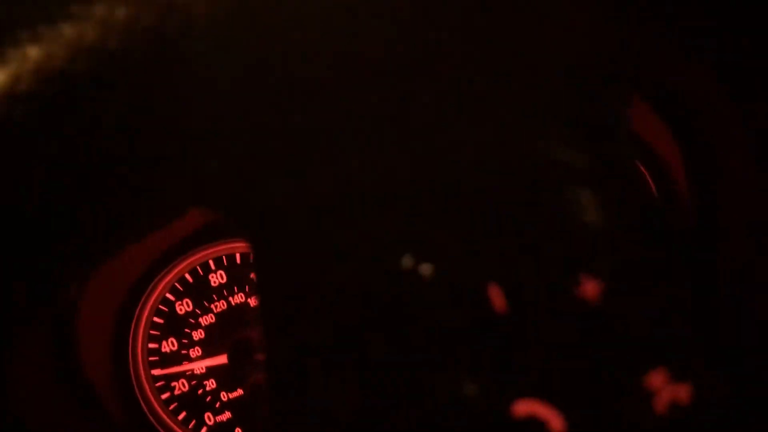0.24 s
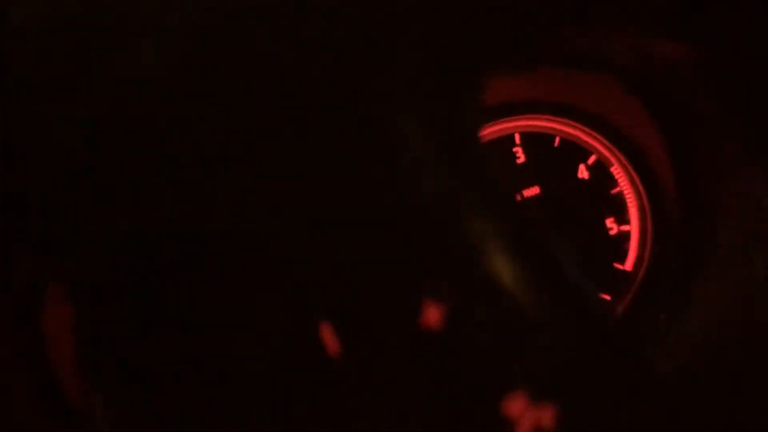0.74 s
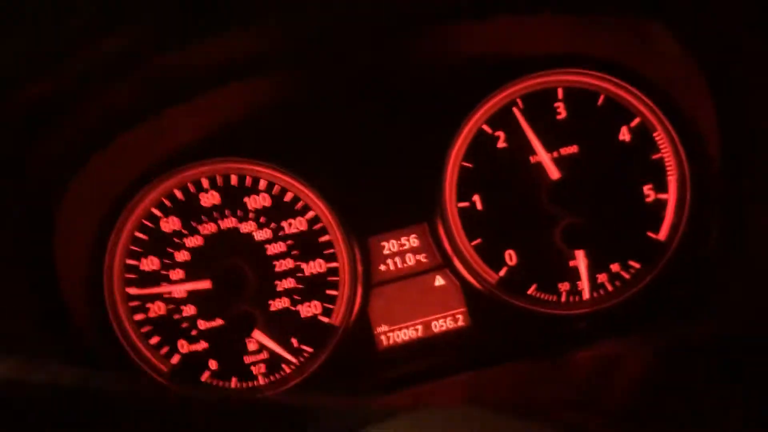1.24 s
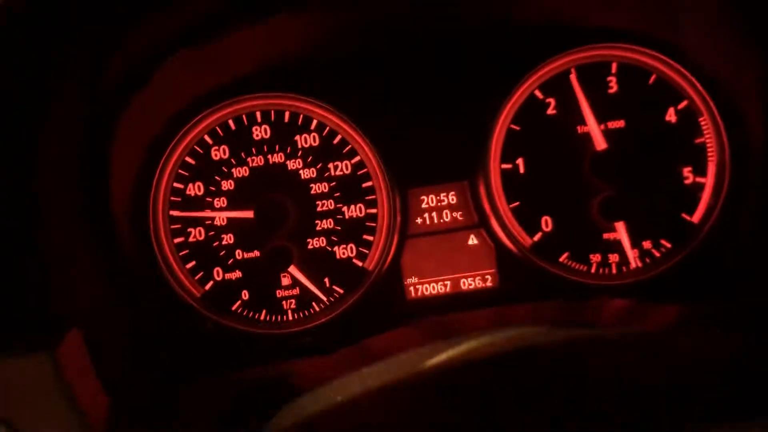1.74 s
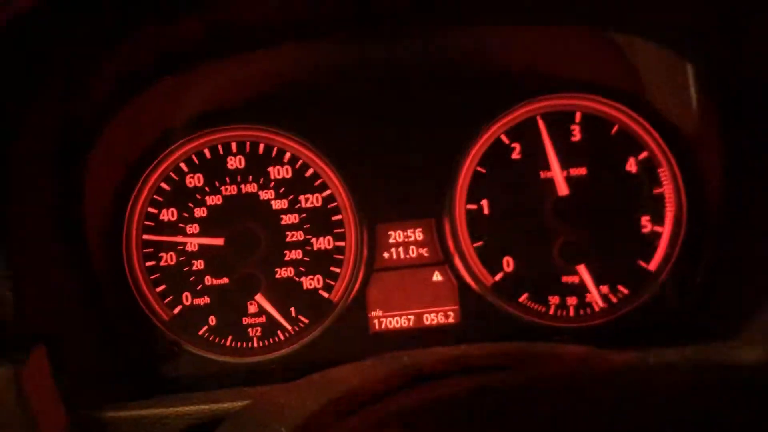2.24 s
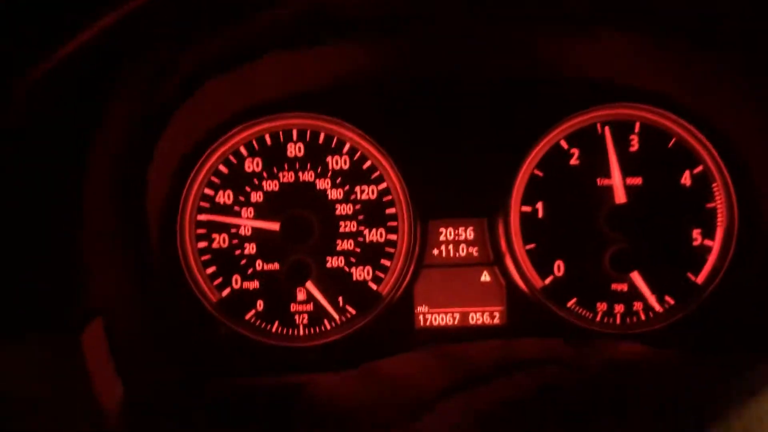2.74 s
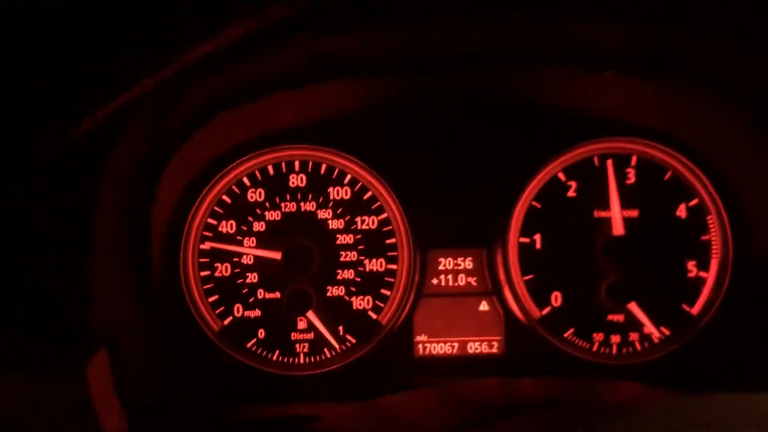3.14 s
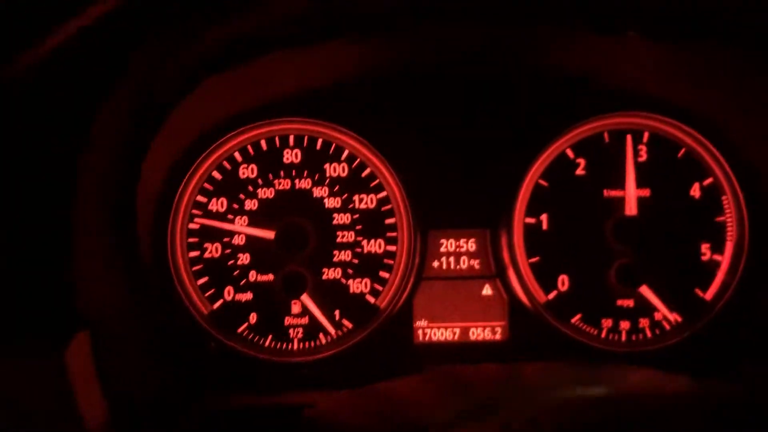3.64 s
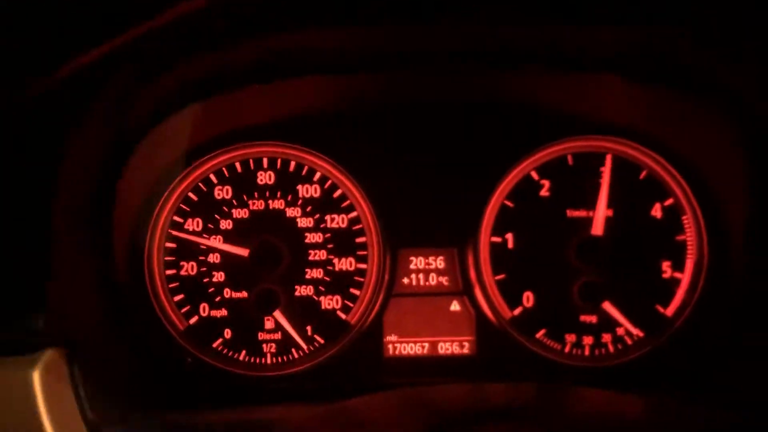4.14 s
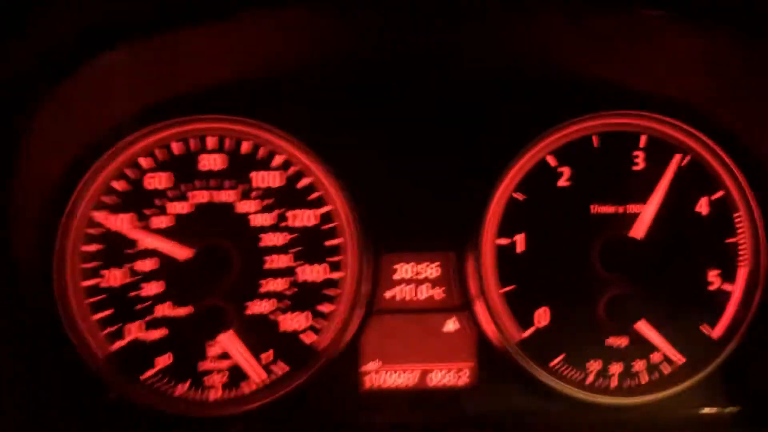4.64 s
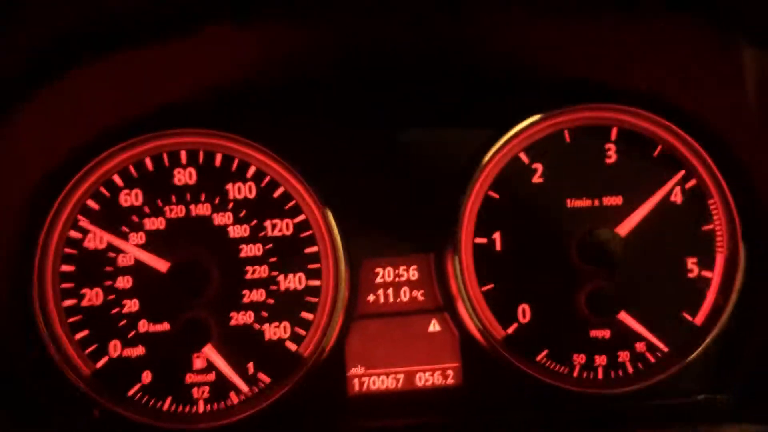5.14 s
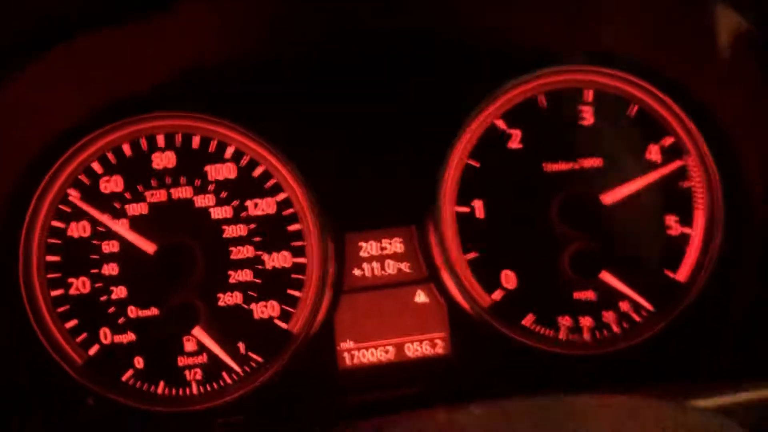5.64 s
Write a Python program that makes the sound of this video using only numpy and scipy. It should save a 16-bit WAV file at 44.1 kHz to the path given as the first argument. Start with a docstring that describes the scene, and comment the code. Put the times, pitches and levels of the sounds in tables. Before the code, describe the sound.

A diesel car is heard from inside the cabin, rolling along with a low engine drone and uneven road rumble. Light trim ticks and a faint cloth rustle sit close to the microphone. After about three and a half seconds the throttle opens and the engine note climbs strongly to the end, with a slight clatter. A few faint metallic clinks and dull thumps from road joints come during the acceleration.

```python
"""Inside the cabin of a six-cylinder diesel car: a light throttle, then a hard pull with a rising note.
The cylinders drone, roar and clatter through the engine mounts and exhaust; the turbo whistles briefly.
Tyres rumble and thump over road joints, which shake loose trim. The body booms and air hisses past
the seals. A sleeve rustles, trim ticks, a small metal thing clinks, and a faint hum stops early on."""
import sys
import numpy as np
from scipy import signal
from scipy.fft import rfft, irfft, next_fast_len
from scipy.io import wavfile

SR = 44100
rng = np.random.default_rng(int(sys.argv[2]) if len(sys.argv) > 2 else 0)


def wav_record(signal):
    """Record a signal, one row per channel, as 16-bit PCM in the file named by sys.argv[1]."""
    frames = np.transpose(np.atleast_2d(signal))
    bounded = np.clip(frames, -1, 1)
    # unit amplitude maps onto the largest positive 16-bit level
    quanta = np.round(bounded * 32767).astype(np.int16)
    wavfile.write(sys.argv[1], SR, quanta)


N = 260190


def engine():
    """The diesel repeats its cycle every two crank turns; its noise comes in through the mounts."""
    # Each row: time in seconds, crank speed in turns a minute.
    speeds = [(0.0, 2411), (0.3, 2424), (0.6, 2410), (1.2, 2447), (1.8, 2511), (2.3, 2579), (2.7, 2654),
              (3.05, 2703), (3.3, 2767), (3.55, 2866), (3.8, 3004), (4.05, 3185), (4.4, 3480), (5.0, 3985),
              (5.45, 4337), (5.9, 4649)]
    # Each row: time in seconds, throttle from 0 (light) to 1 (full).
    throttle = [(0, 0), (3.45, 0.2), (3.8, 0.93), (5.9, 0.9)]
    rpm, = curves(speeds)
    load, = curves(throttle)
    cycle_hz = rpm / 120
    phase = 2 * np.pi * np.cumsum(cycle_hz) / SR
    doublings = np.log2(rpm / 2400)  # of speed, counted from 2400 rpm
    knock = np.exp(.25 * np.cos(6 * phase))  # swells once per firing
    note = drone(cycle_hz, phase, load)
    rough = roar(doublings, knock) + clatter(doublings, knock, phase, load)
    return note + filtered(rough, lambda hz: amp(cabin_db(hz, path=0)))


def drone(cycle_hz, phase, load):
    """Unequal cylinders sound many multiples of the cycle rate; the sixth is the firing rate."""
    # Each row: time in seconds, gain of the whole note in dB.
    loudness = [(0.0, -31.5), (1.5, -32.5), (2.4, -32.5), (3.3, -34), (3.6, -30), (4.7, -27), (5.7, -30),
                (5.9, -32.5)]
    # The low tones. Each row: multiple, level in dB at light load, level in dB at full load.
    low_tones = [(2, 2, 4), (3, -1.5, -6.5), (4, -2, -5), (5, -4, -0.1), (6, 0.4, 2.13), (7, -6, -5),
                 (8, -7.5, -7.5), (9, -8.5, -1.4), (10, -19.5, -10.5), (11, -9, -8.5), (12, -10, -4),
                 (13, -23.5, -14.5), (14, -13.0, -16), (15, -9.5, -13.5)]
    # Tones swell as they cross a part's resonance. Each row: multiple, centre and width in Hz, boost in dB.
    swells = [(6, 170, 14, 5), (9, 228, 16, 4), (9, 330, 14, 6), (11, 335, 14, 5), (12, 370, 18, 4),
              (15, 332, 12, 5), (17, 575, 30, 4), (18, 608, 30, 9), (19, 620, 25, 4), (23, 535, 20, 5),
              (26, 980, 40, 9), (29, 1070, 40, 10), (30, 698, 32, 13), (32, 715, 35, 4), (32, 1065, 35, 9),
              (45, 1690, 50, 10), (47, 985, 20, 5), (51, 1680, 50, 11), (75, 2700, 70, 12)]
    note, samples = np.zeros(N), np.arange(N)
    steps = samples[::256]  # levels change slowly, so coarse steps will do
    for k, light_db, full_db in low_tones + high_tones():
        k = round(k)
        hz = k * cycle_hz[steps]
        path = int(k % 3 == 0)  # exhaust: each bank of three cylinders pulses three times a cycle
        db = light_db + load[steps] * (full_db - light_db)
        db += cabin_db(hz, path) + 1.3 * wobble(5, steps)
        db += sum(boost * bump(hz - centre, width) for j, centre, width, boost in swells if round(j) == k)
        drift = rng.uniform(0, 2 * np.pi) + 0.29 * wobble(6, steps)
        tone = np.sin(k * phase + np.interp(samples, steps, drift))
        note += np.interp(samples, steps, amp(db)) * tone
    return np.sqrt(2) * amp(curves(loudness)[0]) * note


def high_tones():
    """The higher multiples get steadily weaker, in a pattern of three; a few stand out."""
    # Rows for remainders 0, 1, 2 of multiple / 3. Each row: extra dB at light load, at full load.
    pattern = [(2.5, 1), (-2.5, -1.5), (0.5, 2.5)]
    # Each row: multiple (rounded below), extra dB at light load, at full load.
    standouts = [(23, 4, 1.5), (30, 4, -1.5), (32, 9.5, 3), (33, 10, -1.5), (36, 6, -3.5), (47, 7.5, 2),
                 (48, 2.5, 0), (54, -0.5, 5.5), (57, 4, 1.5), (60, -1.5, 4), (62.5, -1, 5)]
    multiples = np.arange(16, 76)
    octaves = np.log2(multiples / 16)
    light_db, full_db = -23.5 - 11.5 * octaves, -18 - 16 * octaves
    extra_db = {round(k): db for k, *db in standouts}
    db = np.transpose([light_db, full_db])
    db += [np.add(pattern[k % 3], extra_db.get(k, 0)) for k in multiples]
    db += 1.8 * rng.standard_normal((len(multiples), 1))
    return list(zip(multiples, *db.T))


def roar(doublings, knock):
    """Low noise from the engine bay pulses with the combustion knock and grows with speed."""
    # Each row: frequency in Hz, relative level in dB.
    colour = [(50, -120), (200, 0.5), (350, 7.5), (600, -4), (800, -4.5), (1050, -8), (1300, -9.5),
              (1700, -24), (2400, -51), (6000, -120)]
    return amp(-42.5 + 12 * doublings) * noise(colour, knock)


def clatter(doublings, knock, phase, load):
    """Valves and injectors clatter; part of it repeats every cycle, which makes a high snarl."""
    # Each row: frequency in Hz, relative level in dB.
    colour = [(500, -120), (1100, -8.5), (1600, -1.5), (2200, -6.5), (3000, -11), (4000, -15.5),
              (4800, -21), (7000, -26.5), (10000, -29.5), (15800, -47.5)]
    db = -63 + 9.5 * doublings + 2.5 * load
    loose = amp(db + 2 * wobble(20)) * noise(colour, knock)
    one_cycle = rng.standard_normal(512)
    repeated = np.interp(phase / (2 * np.pi) % 1 * 512, np.arange(512), one_cycle, period=512)
    return loose + amp(db - 1 + 3 * load) * coloured(repeated, colour)


def cabin_db(hz, path):
    """Resonances boost or weaken each pitch on its way to the ear (path 0: mounts, 1: exhaust)."""
    # Each row: centre in Hz, width in Hz, gain in dB through the mounts, through the exhaust.
    resonances = [(45.6, 25.3, -11.5, -12.5), (71, 5.1, 4.5, -0.5), (102, 47, -5, 1.5),
                  (153, 17, -2.1, -3.5), (178, 8.2, 3.5, 4), (195, 15, -9.5, -1.1), (269, 15, 2, -2),
                  (320.7, 17, -3, -5.5), (357.6, 11.4, -5, -7), (390, 20, -4.5, -5.5), (438, 11, -1, -2),
                  (459, 22, 0.2, -1.5), (541, 19, 4.5, 0.5), (611, 16, 6.5, 5), (706, 22, 7, 5),
                  (734, 32, -5, -4), (828, 30, -3, 0.5), (854, 4.9, 2.5, -0.5), (957, 27, 2, -2.5),
                  (1059, 3.9, 7.5, -7), (1210, 120, -3.5, -7.5), (1685, 13, 5.5, 10), (2100, 33, 4, 5),
                  (2450, 120, -0.5, -3), (2676, 48, 2, 5), (3630, 220, 2, 5)]
    return sum(gains[path] * bump(hz - centre, width) for centre, width, *gains in resonances)


def road():
    """The rolling tyres rumble and the car body booms, both unevenly."""
    # Each row: time in seconds, rumble level in dB, boom level in dB.
    levels = [(0.0, -41, -25), (0.38, -43, -26.5), (0.8, -35, -29), (1.2, -40, -30.5), (1.62, -44, -29.5),
              (1.9, -30, -35), (2.45, -39, -31), (2.75, -32, -36.5), (2.96, -48, -28.5), (3.27, -30, -34.5),
              (3.65, -39, -37), (3.9, -29.5, -32.5), (4.45, -38, -29.5), (4.72, -26.5, -26),
              (5.27, -29, -25), (5.9, -25, -19)]
    # Each row of both: frequency in Hz, relative level in dB.
    rumble_colour = [(12, -45), (24, -22), (31, -12), (45, -2), (70, 0), (100, -3), (140, -14), (250, -40),
                     (1000, -120)]
    boom_colour = [(20, -120), (60, -6.5), (100, 1), (125, 7), (150, 0), (180, -1), (230, -7), (300, -11),
                   (400, -26.5), (700, -55.5), (3000, -120)]
    rumble_db, boom_db = curves(levels)
    rumble = amp(rumble_db + 1.2 * wobble(5)) * noise(rumble_colour)
    boom = amp(boom_db + 1.7 * wobble(8.3)) * noise(boom_colour)
    return rumble + boom


def thumps():
    """The suspension takes each road joint softly: a few vibrations that swell and die."""
    # Each row: middle in seconds, level in dB, pitch in Hz, length in seconds.
    joints = [(4.511, -4, 190.6, 0.012), (4.598, -7.5, 192, 0.013), (4.618, -8, 193, 0.017),
              (5.0075, -1.5, 180, 0.0092)]
    out, t = np.zeros(N), np.arange(-2000, 2000) / SR
    for s, db, hz, length in joints:
        phase = 2 * np.pi * hz * t
        body = np.sin(phase) + amp(-13) * np.sin(1.8 * phase)  # the body also rings at a higher pitch
        out[round(s * SR) - 2000:][:len(t)] -= amp(db) * bump(t, length / 2) * body
    return out


def clinks():
    """A small metal piece touches another and rings high; two close pitches beat together."""
    # Each row: start in seconds, level in dB, relative dB of the high and of the low varying ring.
    hits = [(3.414, -30, -28, -24), (3.8516, -48.5, -16, -12), (4.2737, -58.5, -23, -7.5),
            (4.29, -52, -4.5, -3), (4.793, -41, -24, -24)]
    # Rings alike in every hit. Each row: pitch in Hz, relative level in dB, seconds to fade by 60 dB.
    steady_rings = [(11306, -5, .12), (11315, -5.5, .11), (9000, -14, .025), (15190, -24, .1)]
    # Rings whose strength depends on the spot struck. Each row: pitch in Hz, seconds to fade by 60 dB.
    varying_rings = (14150, .2), (8040, 0.11)
    out, t = np.zeros(N), np.arange(SR // 4) / SR
    attack = 1 - np.exp(-t / 0.00075)
    ring = lambda hz, db, fade_s: amp(db - 60 * t / fade_s) * np.sin(2 * np.pi * hz * t)
    steady = sum(ring(*row) for row in steady_rings)
    for s, db, *ring_db in hits:
        varying = sum(ring(hz, level, fade_s) for (hz, fade_s), level in zip(varying_rings, ring_db))
        out[round(s * SR):][:len(t)] += amp(db) * attack * (steady + varying)
    return out


def ticks():
    """Trim and leather give short noisy snaps, each with its own colour; faint ones come at random."""
    # Each row: start in seconds, level in dB, centre in Hz, relative dB of the dull and the bright part.
    snaps = [(0.2233, -55, 3830, 1, -10), (0.2767, -55, 3510, 4, 1), (0.5214, -60, 3650, 24, -16),
             (0.759, -53.5, 3580, 13, -14), (0.8012, -39.5, 5150, 7.5, -24), (0.8156, -42, 3720, 9, -23),
             (0.8608, -38, 3630, 12, -26), (0.936, -45, 3710, 1, 1), (0.9466, -40, 3510, 13, -17.5),
             (0.9803, -50.5, 4330, 5, -10), (1.1194, -45.5, 8140, 9, -17.5), (1.212, -47.5, 4370, 11, -5.5),
             (1.383, -43.5, 3500, 13, -4.5), (1.5072, -41, 3540, 10.5, -7), (1.559, -41.5, 6060, 3, -18.5),
             (1.6042, -55.5, 6030, 4, -12), (1.6957, -46, 3500, -4, -32), (1.763, -44, 4430, 14, -1),
             (1.8152, -44.5, 3710, 2, -19), (1.837, -54, 4680, 17, 2), (2.0423, -41.5, 4020, 10, -3),
             (2.178, -60, 3650, 20, -7), (2.636, -52.5, 3970, 1, -14), (2.6704, -53.5, 3650, 16, -12.5),
             (2.7563, -48.5, 4760, 5, -15.5), (2.814, -57.5, 3700, 4, -12), (3.2928, -54, 4150, 16, -9),
             (3.3526, -52.5, 3720, 11, -14.5), (3.3846, -51, 4130, 16, -4), (3.4108, -43, 8920, -7, -14.5),
             (3.433, -41, 4420, 3.5, -14), (3.484, -49, 4830, 11, -13), (3.652, -50, 3720, 12, -18),
             (3.6856, -45, 3860, 9.5, -20.5), (3.7144, -47, 3580, 13, -14.5), (3.745, -48, 4690, 0, -14.5),
             (3.773, -46, 4410, -1, -15), (3.8492, -45.5, 3770, -2, -2), (3.89, -43.5, 4330, 6, -19),
             (4.0466, -42.5, 3850, 4, -17.5), (4.111, -41, 3570, 4, -15), (4.2777, -42.5, 3640, -3, -9),
             (4.502, -52.5, 3700, 11.5, -18.5), (4.594, -49.5, 3680, 6.5, -15),
             (4.6882, -52.5, 4380, 4.5, -24.5), (4.764, -58, 3680, 6, 3), (4.79, -50, 3520, 3.5, 2.5),
             (4.871, -47, 3700, 5, -7), (4.8864, -43, 3720, -5, -23), (4.96, -51, 3640, 6.5, -9),
             (4.9965, -49.5, 3890, 12.5, -6), (5.015, -47, 3500, 11.5, -9.5),
             (5.034, -51.5, 3610, 16, -5.5), (5.0738, -50.5, 3650, 9, -18.5), (5.5264, -48.5, 3670, 6, -9),
             (5.8613, -53.5, 3610, 18, -14)]
    faint = [(s, -63, 3800, 8, -11) for s in rng.uniform(.01, N / SR, 24)]
    fade_s, attack_s = 0.04, .0014
    out, t, f = np.zeros(N + 4096), np.arange(4096) / SR, np.fft.rfftfreq(4096, 1 / SR)
    band = lambda hz, sharpness: 1 / np.sqrt(1 + (sharpness * (f / hz - hz / (f + 1))) ** 4)
    for s, db, hz, dull_db, bright_db in snaps + faint:
        snap = amp(db - 60 * t / fade_s) * (1 - np.exp(-t / attack_s)) * rng.standard_normal(len(t))
        colour = amp(dull_db) * band(2070, 1.27) + band(hz, 3.9)
        colour += amp(-2) * band(6400, 1.7) + amp(bright_db) * band(11000, 1.3)
        out[round(s * SR) - 64:][:len(t)] += irfft(rfft(np.roll(snap, 64)) * colour)
    return out[:N]


def rattles():
    """Loose trim scrapes for a moment after a jolt."""
    # Each row: start in seconds, level in dB, fading time in seconds.
    jolts = [(4.503, -55.5, 0.033), (4.593, -51.5, 0.023), (4.685, -57.5, .04), (5.005, -57.5, 0.058),
             (5.524, -62, .04), (5.87, -57, .05)]
    # Each row: frequency in Hz, relative level in dB.
    colour = [(1500, -120), (3000, -8), (4400, 5), (5500, -4.5), (9000, -14.5), (15800, -21.5)]
    t = np.arange(N) / SR
    shake = sum(amp(db) * (t > s) * np.exp(-np.abs(t - s) / fade_s) for s, db, fade_s in jolts)
    return shake * noise(colour, amp(3.5 * wobble(250)))


def sleeve():
    """Cloth drags over cloth in uneven grains, in strokes that swell and fade."""
    # Each row: loudest moment in seconds, level in dB, seconds to fall by 7 dB.
    strokes = [(1.007, -53.5, 0.08), (1.284, -54.5, 0.089)]
    # Each row: frequency in Hz, relative level in dB.
    colour = [(600, -120), (1500, -19), (2500, -1), (3900, -2.5), (6000, -0.5), (8000, -3.5), (11300, -6),
              (15800, -13)]
    t = np.arange(N) / SR
    swell = sum(amp(db - 7 * np.abs(t - s) / fall_s) for s, db, fall_s in strokes)
    return swell * noise(colour, amp(wobble(60)))


def whines():
    """Two thin, unsteady tones: the turbo's rising whistle and a hum while the wheel turns."""
    # Each row of both: time in seconds, pitch in Hz, level in dB.
    turbo = [(3.7, 12900, -100), (3.78, 13300, -89), (4.0, 14670, -91), (4.15, 15500, -98)]
    hum = [(0, 1637, -61), (.95, 1637, -61), (1.15, 1637, -90)]
    out, t = np.zeros(N), np.arange(N) / SR
    for rows in (turbo, hum):
        hz, db = curves(rows)
        sounding = (t > rows[0][0]) & (t < rows[-1][0])
        level = np.sqrt(2) * amp(db + 2.5 * wobble(25))
        out += sounding * level * np.sin(2 * np.pi * np.cumsum(hz) / SR + .7 * wobble(30))
    return out


def air():
    """Air hisses faintly past the seals."""
    # Each row: frequency in Hz, relative level in dB.
    colour = [(1000, -120), (3000, 0), (5000, 1.5), (9000, -3.5), (13000, -7), (15800, -10.5)]
    return amp(-71.5 + .8 * wobble(3.6)) * noise(colour)


def amp(db):
    """Turn decibels into a plain multiplier."""
    return 10 ** (np.asarray(db) / 20)


def bump(offset, width):
    """A bell-shaped curve, 1 where the offset is zero."""
    return np.exp(-(offset / width) ** 2)


def curves(rows):
    """One value per sample for each column after the time."""
    seconds, *columns = np.transpose(rows)
    return [np.interp(np.arange(N) / SR, seconds, column) for column in columns]


def wobble(rate, at=np.arange(N)):
    """A random curve with `rate` points a second, read at the given samples."""
    points = rng.standard_normal(int(N * rate / SR) + 2)
    return np.interp(at * rate / SR, np.arange(len(points)), points)


def filtered(x, response):
    """Scale each frequency in x by response(hz)."""
    size = next_fast_len(N + 8192)
    return irfft(rfft(x, size) * response(np.fft.rfftfreq(size, 1 / SR)), size)[..., :N]


def coloured(x, colour):
    """Shape x by rows of frequency and dB, then set its average power to 1."""
    freqs, db = np.transpose(colour)
    shaped = filtered(x, lambda hz: amp(np.interp(np.log(hz + 1), np.log(freqs + 1), db)))
    return shaped / np.sqrt(np.mean(shaped ** 2) + 1e-20)


def noise(colour, flutter=1):
    """White noise, multiplied by the flutter and then coloured."""
    return coloured(flutter * rng.standard_normal(N), colour)


def scene():
    """Road, cabin and engine sounds add up in one channel."""
    rolling = road() + thumps() + air()
    small_sounds = sleeve() + ticks() + rattles() + clinks()
    return (engine() + whines() + rolling + small_sounds)[None]


def record(dry):
    """The sound fades in and out over a few milliseconds; nothing is kept above 15830 Hz."""
    fade = signal.windows.tukey(N, .012 * SR / N)
    return filtered(dry * fade, lambda hz: hz < 15830)


dry = scene()
out = record(dry)
wav_record(out)
```